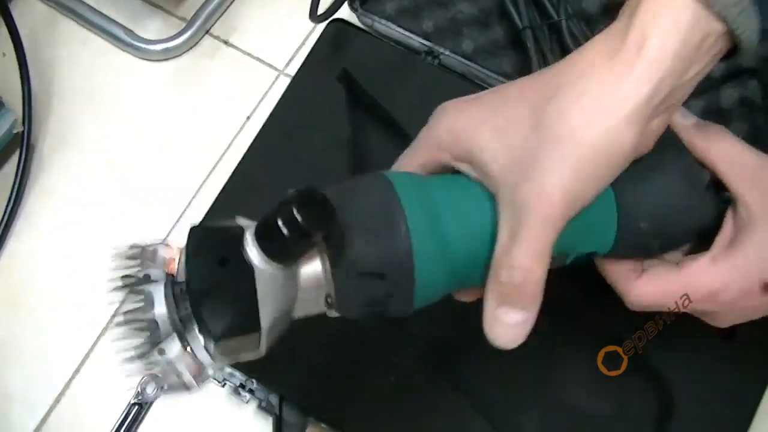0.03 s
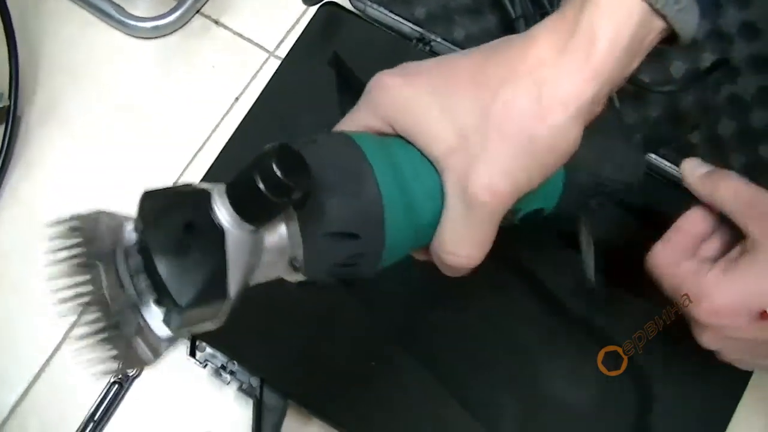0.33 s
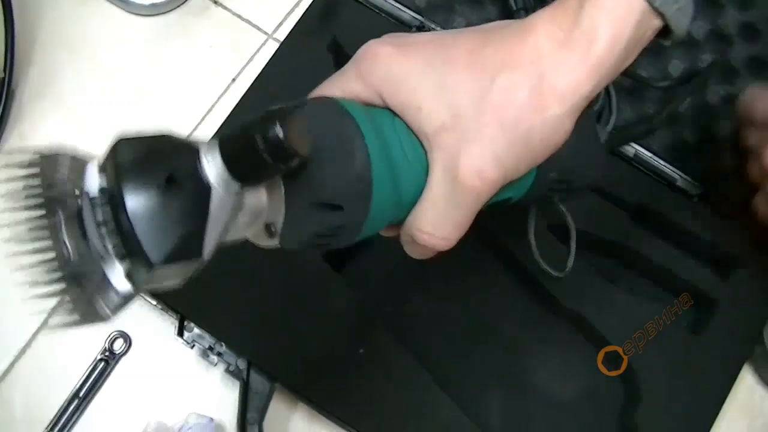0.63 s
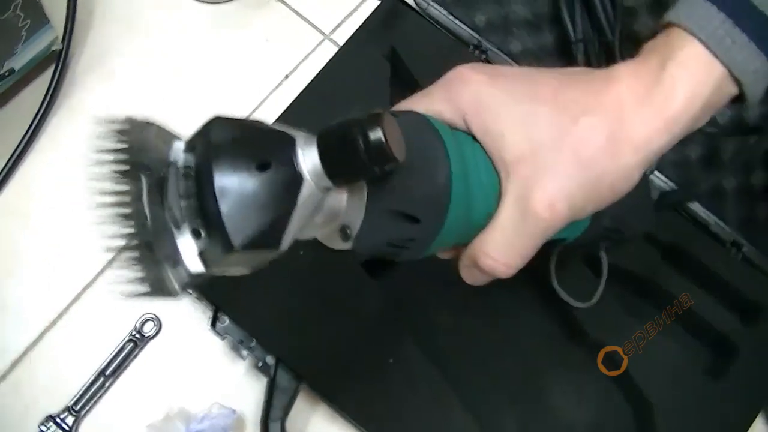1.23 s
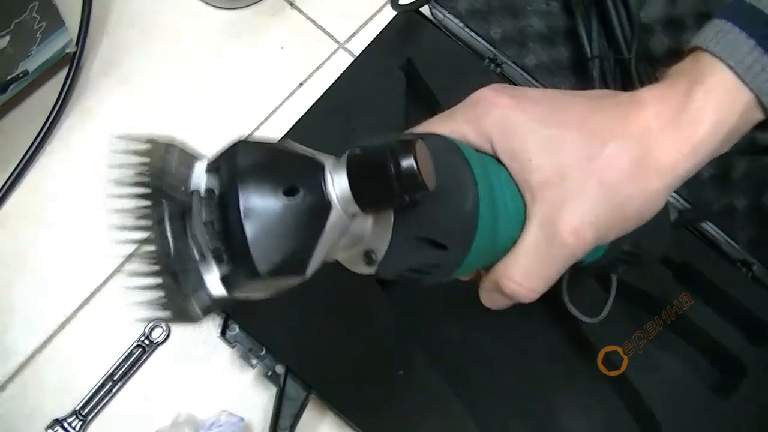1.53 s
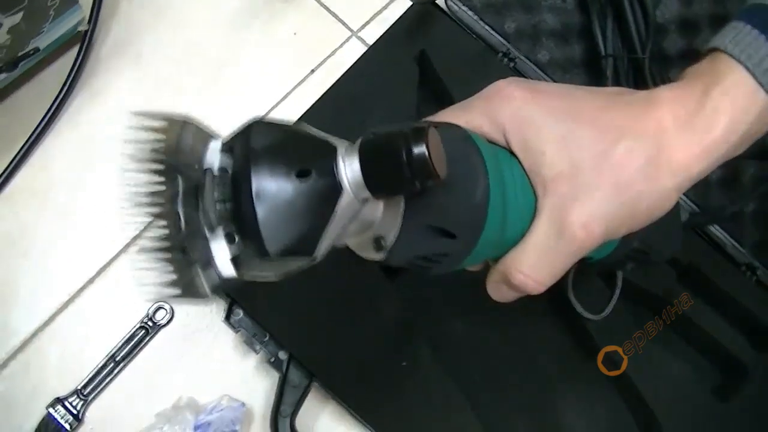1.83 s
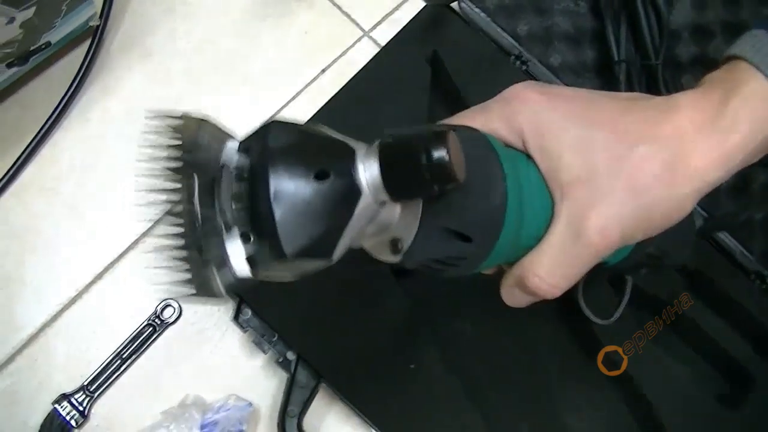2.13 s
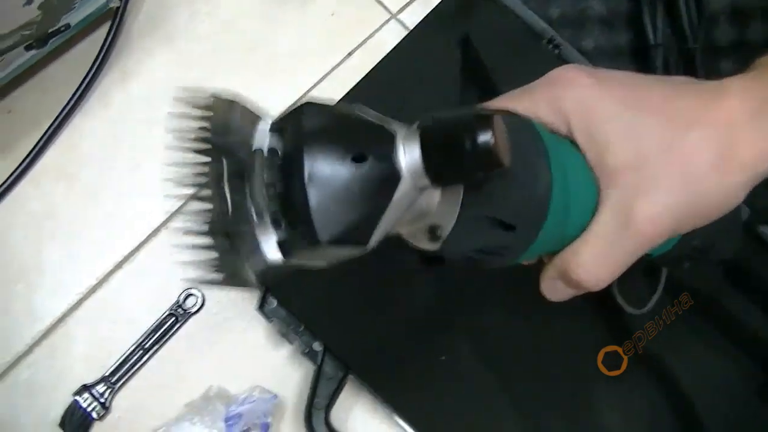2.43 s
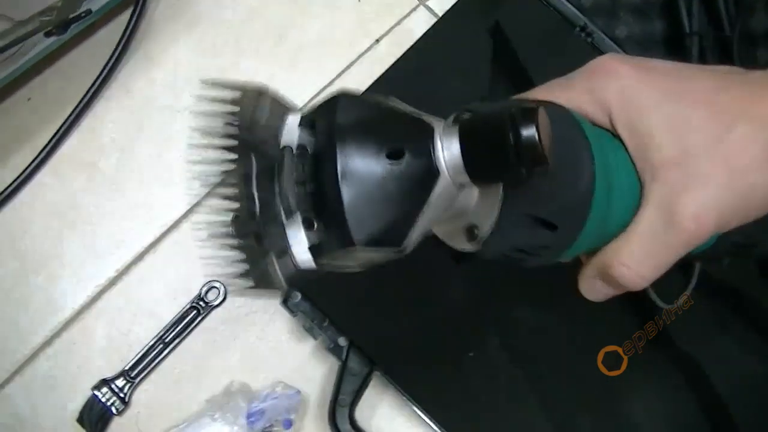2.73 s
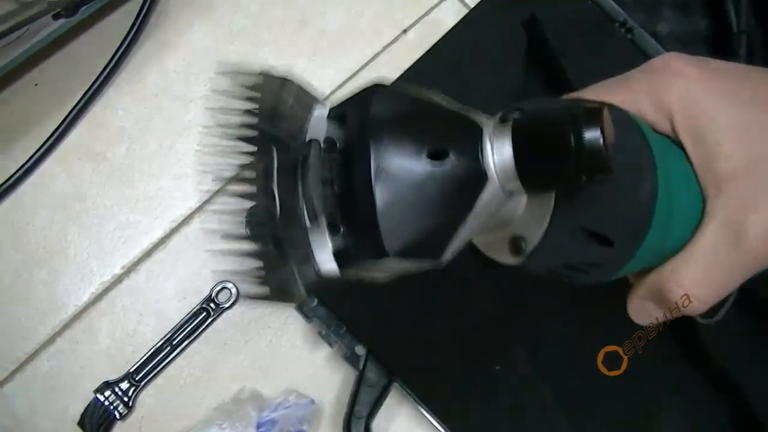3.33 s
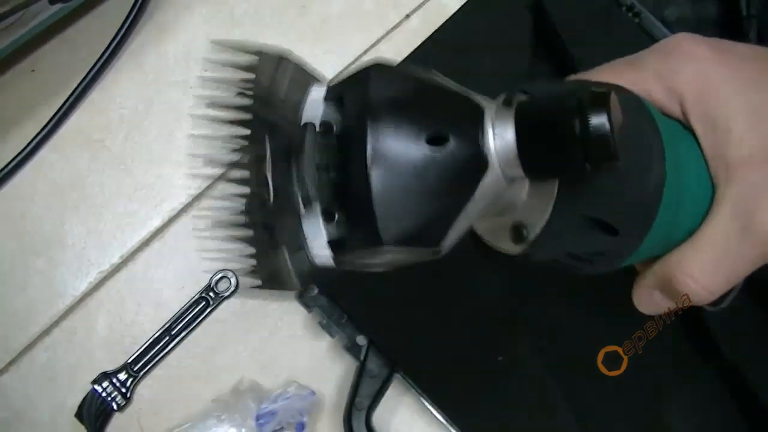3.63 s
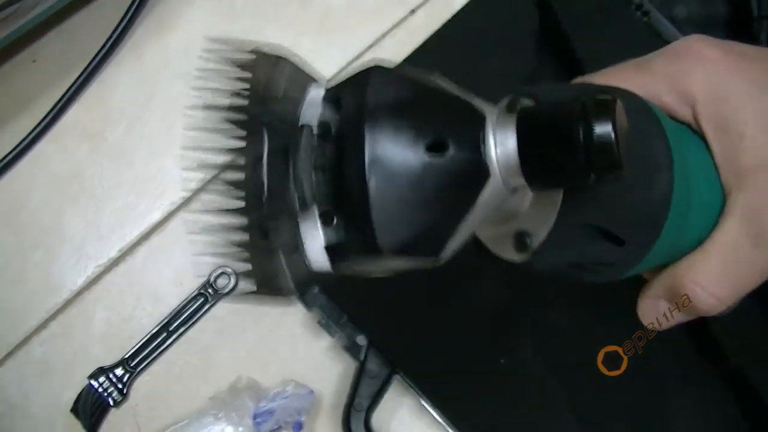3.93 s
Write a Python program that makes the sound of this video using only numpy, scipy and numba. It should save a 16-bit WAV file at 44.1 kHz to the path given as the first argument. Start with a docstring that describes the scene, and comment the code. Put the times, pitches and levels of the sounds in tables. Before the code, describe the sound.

Handheld electric shears buzz continuously without cutting, their steel blades clattering fast, close by indoors.

```python
"""A small tiled room, with electric sheep shears running unloaded in the hand, close to the microphone.
The motor hums and its fan whistles over rushing air. A geared crank knocks the drive fork and throws
the steel cutter to and fro, clacking at each reversal. The balance shifts as the tool is turned,
and the recorder's gain control ducks after the hardest clacks."""
import sys
import numpy as np
from scipy import signal
from scipy.fft import rfft, irfft
from scipy.io import wavfile
from scipy.ndimage import uniform_filter1d
from numba import njit

SR = 44100
rng = np.random.default_rng(int(sys.argv[2]) if len(sys.argv) > 2 else 0)


def generate_wav(signal):
    """Clip the signal to [-1, 1] and save it as 16-bit WAV at the path in sys.argv[1]."""
    frames = np.transpose(np.atleast_2d(signal))
    scaled = np.clip(frames, -1, 1) * 32767
    pcm = np.round(scaled).astype(np.int16)
    wavfile.write(sys.argv[1], SR, pcm)


N = 176400
TIME = np.arange(N) / SR


def undb(db):
    """Decibels to gain."""
    return 10 ** (np.asarray(db) / 20)


def level(x, db):
    """Set the rms level."""
    return x * undb(db) / np.sqrt(np.mean(x ** 2))


def gains(table):
    """One gain curve for each dB column of a table over time."""
    when, *columns = np.array(table, float).T
    return [undb(np.interp(TIME, when, db)) for db in columns]


def wander(rate_hz):
    """Smooth random drift at unit level."""
    hold = max(int(SR / rate_hz), 2)
    steps = np.repeat(rng.standard_normal(N // hold + 1), hold)
    return level(uniform_filter1d(steps, hold)[:N], 0)


def colour(x, points):
    """Causal filter through (Hz, dB) points."""
    hz, db = np.array(points, float).T
    size = 4096
    bins_hz = np.maximum(np.arange(size // 2 + 1) * SR / size, 1)
    response = undb(np.interp(np.log(bins_hz), np.log(hz), db))
    cepstrum = irfft(np.log(response))
    cepstrum[1:size // 2] *= 2
    cepstrum[size // 2 + 1:] = 0
    return signal.fftconvolve(x, irfft(np.exp(rfft(cepstrum))))[:N]


def resonate(x, hz, width_hz):
    """One resonance, at unit level."""
    return level(signal.lfilter(*signal.iirpeak(hz, hz / width_hz, fs=SR), x), 0)


def tone(turns, multiple, flutter):
    """A tone locked to the motor, trembling in level and phase."""
    tremble = 1 + flutter * (wander(90) + 1j * wander(90))
    return level(np.real(tremble * np.exp(2j * np.pi * (multiple * turns + rng.random()))), 0)


def blows(times, sizes):
    """An impulse at each time."""
    out = np.zeros(N)
    inside = (times >= 0) & (times < (N - 1) / SR)
    np.add.at(out, (times[inside] * SR).astype(int), sizes[inside])
    return out


def chatter(hits, ring_s):
    """A short burst of fresh rattle after each impulse."""
    pole = np.exp(-2 / (ring_s * SR))
    energy = signal.lfilter([1 - pole], [1, -pole], hits ** 2 + 1e-18)
    return np.sqrt(energy) * rng.standard_normal(N)


def ring(ring_s):
    """Dense, even, quickly dying modes of one contact point."""
    t = TIME[:1024]
    spectrum = rfft(rng.standard_normal(len(t)) * np.exp(-t / ring_s))
    return irfft(spectrum / np.sqrt(uniform_filter1d(abs(spectrum) ** 2, size=13)))


# Motor and gear tones, as multiples of the motor speed, and the level of each in dB.
HUM_ORDERS = (1, 1.08, 1.32, 6, 11.68, 12.32, 17.06, 18, 24)
HUM_DB = (-49, -58, -54.5, -49, -42, -40.5, -43, -39, -51)
# Gear whine at the microphone. Each row: time in seconds, whine in dB, upper sideband in dB.
WHINE_LEVELS = [(0, -32.5, -47), (.45, -30, -43), (.7, -47, -39), (1.2, -40, -35), (1.8, -49, -44),
                (2.5, -40, -36), (3, -39, -32), (3.35, -36, -30), (3.6, -42, -42), (4, -36, -37)]

def motor(turns):
    """The shaft hums and the gears whine."""
    hum = sum(undb(db) * tone(turns, order, flutter=.33 + .06) for order, db in zip(HUM_ORDERS, HUM_DB))
    whine, sideband = gains(WHINE_LEVELS)
    return hum + whine * tone(turns, 12, flutter=.33) + sideband * tone(turns, 12.24, flutter=.33)


# Cooling air, heard close up. Each row: frequency in Hz, gain in dB.
AIR_SPECTRUM = [(25, -30), (90, -26), (160, -18.5), (300, -16), (440, -8), (530, -12.5), (590, -1.5),
                (680, -1.5), (770, -0.5), (950, -1.5), (1170, 1.5), (1600, -1.9), (2100, -1), (2600, 5),
                (3600, -1), (5200, -0.5), (6400, -5.5), (8000, -7.5), (11000, -11.5)]
# Hollow ring of the air in the motor casing. Each row: time in seconds, level in dB.
HOLLOW_LEVELS = [(0, -38), (.5, -34), (.63, -38), (1, -30.5), (1.3, -38), (1.6, -35), (1.9, -37.5),
                 (2.25, -35), (2.7, -44.5), (4, -41)]

def cooling_air(rush_gain):
    """Air rushes through the vents and rings the casing."""
    flow = level(colour(rng.standard_normal(N), AIR_SPECTRUM), -23.5)
    hollow = resonate(colour(rng.standard_normal(N), AIR_SPECTRUM), hz=773, width_hz=112)
    return rush_gain * flow + gains(HOLLOW_LEVELS)[0] * hollow


def fan_whistle(turns, blades=9):
    """The fan whistles at the rate its blades pass."""
    return undb(-22.5) * tone(turns, blades, flutter=.11)


# Contacts in one crank turn. Each row: place in turns, fork knock and cutter clack in relative dB.
CONTACTS = [(.028, -3.5, -3.5), (.062, -7, -4), (.15, -24, -6.5), (.44, -4, -12), (.527, 1, -2),
            (.565, -8, -7.5), (.66, -28, -8), (.94, -9, -8.5)]

def rattle(crank, sizes_db, ring_s, loose, jitter_s=.00004, scatter_db=1.56):
    """Each contact strikes once a crank turn; part of its ring repeats, part is loose chatter."""
    out = 0
    for (place, *_), db in zip(CONTACTS, sizes_db):
        times = np.interp(np.arange(int(crank[-1]) + 1) + place, crank, TIME, right=-1)
        late, strong = rng.standard_normal((len(times), 2)).T
        hits = blows(times + jitter_s * late, undb(db + scatter_db * np.minimum(strong, 1.7)))
        ringing = signal.fftconvolve(hits, ring(ring_s))[:N]
        out = out + np.sqrt(1 - loose) * ringing + np.sqrt(loose) * chatter(hits, ring_s)
    return out


# Ring of the gear housing. Each row: frequency in Hz, gain in dB.
HOUSING_SPECTRUM = [(100, -50), (300, -32), (520, -20.5), (590, -19), (760, -9.5), (950, -17),
                    (1170, -12.5), (1600, -12), (2100, -8), (2450, 3.5), (2900, -0.5), (3500, -12.5),
                    (4500, -11.5), (6500, -32), (11000, -19)]

def drive_fork(crank):
    """The fork's knocks ring the gear housing."""
    knocks = rattle(crank, np.array(CONTACTS)[:, 1], ring_s=.00086, loose=.55)
    return level(colour(knocks, HOUSING_SPECTRUM), -24.5)


# Ring of the cutter head. Each row: frequency in Hz, gain in dB.
HEAD_SPECTRUM = [(100, -38), (600, -20), (2000, -12.5), (2700, -4.5), (3200, -5.5), (3600, -12), (4150, -2),
                 (4650, 0.5), (4950, -1), (5350, -0.5), (5850, -3), (6350, -10.5), (6900, -7.5),
                 (7400, -10.5), (8300, -10.5), (11000, -16.5)]
# Sharp resonances of the steel head. Each row: frequency in Hz, width in Hz.
STEEL_MODES = [(4330, 84), (4590, 72), (5330, 180)]
# What reaches the microphone as the head swings round. Each row: time in seconds, dB of each mode.
STEEL_FACING = [(0, -48, -30, -22.5), (.2, -55, -27, -31), (.5, -46, -24.5, -29), (.65, -47, -33, -34),
                (.95, -35, -32, -27.5), (1.3, -31, -43, -29), (1.5, -32, -44, -38), (2, -33, -40, -35),
                (2.5, -45, -42, -34), (3.3, -39, -38, -30), (3.6, -52, -47, -37), (4, -42, -42, -33)]

def cutter_head(crank, clack_gain):
    """The cutter clacks at each reversal and keeps the steel head ringing."""
    strokes = rattle(crank, np.array(CONTACTS)[:, 2], ring_s=.001, loose=.7)
    clacks = level(colour(strokes, HEAD_SPECTRUM), -21.5)
    scrape = colour(strokes * rng.standard_normal(N), HEAD_SPECTRUM)
    steel = sum(gain * resonate(scrape, *mode) for mode, gain in zip(STEEL_MODES, gains(STEEL_FACING)))
    return clack_gain * clacks + steel


# The hardest clacks. Each row: start in seconds, strength in relative dB.
HARD_CLACKS = [(.1337, -7), (.5306, 0), (.6099, 4), (.8611, 1), (1.324, 7), (1.4299, -2.5), (1.6016, -20),
               (1.8538, -10), (1.9596, -1), (2.145, -1), (2.2243, -14), (2.4893, 4.5), (2.7543, -3.1),
               (2.9925, 7), (3.1117, -13), (3.2577, 4.5), (3.4693, 0.5), (3.5488, 2)]

def hard_clacks():
    """Now and then the cutter hits its stop much harder."""
    times, db = np.array(HARD_CLACKS).T
    hits = blows(times, undb(db + 9))
    return colour(chatter(hits, ring_s=.00033), HEAD_SPECTRUM)


def room(x, t60_s=.18, echo_db=-8.5):
    """Reflections from the tiles and the open case follow the direct sound to the microphone."""
    t = TIME[:SR // 2]
    tail = rng.standard_normal(len(t)) * undb(-60 * t / t60_s) * (t > .002)
    return x + undb(echo_db) * signal.fftconvolve(x, tail / np.sqrt(np.sum(tail ** 2)))[:N]


# Motor speed. Each row: time in seconds, turns per second.
MOTOR_SPEED = [(0, 313.59), (.3, 314.41), (.65, 315.88), (1, 315.16), (1.4, 314.83), (2, 314.57),
               (2.7, 314.46), (3.5, 314.67), (4, 315.11)]
# The tool turns near the microphone. Each row: time in seconds, then fork, cutter, air, fan gain in dB.
TURNING = [(0, -9, -4, -1, -15), (.13, -4, -2.5, -1.5, -4.5), (.27, -2.5, -2.5, 1, -8),
           (.5, -3.5, 0, 2.5, -6), (.62, -11, -2, -1, -11.5), (.76, 1, .5, 2.5, 0), (.98, -1, 1, 3, -6),
           (1.25, 1, -0.5, 2.5, 1), (1.7, 0, -3.5, -0.5, -4.5), (2.05, -3.5, -1, 0.5, 0),
           (2.9, -0.5, -3, 0, 1), (3.25, 0, -1.5, 2, 0), (3.6, -1.5, -5, -2.5, -2.5), (4, 2, 2.5, 4, 1.5)]

def scene():
    """The motor drives fan, gears and cutter together."""
    turns = np.cumsum(np.interp(TIME, *np.array(MOTOR_SPEED).T)) / SR
    crank = turns * (6 / 50)  # gear ratio
    fork_gain, clack_gain, rush_gain, fan_gain = gains(TURNING)
    knocks = fork_gain * drive_fork(crank)
    clacks = cutter_head(crank, clack_gain)
    whistle = fan_gain * fan_whistle(turns)
    clatter = room(knocks + clacks + hard_clacks())
    return (clatter + cooling_air(rush_gain) + whistle + motor(turns))[None]


@njit
def peaks(x, fall):
    """Peak follower: jumps up at once and sinks slowly."""
    out, held = np.empty(len(x)), 0.
    for i in range(len(x)):
        held = max(abs(x[i]), held * fall)
        out[i] = held
    return out


def record(dry):
    """Gain control ducks just after each peak; overloads clip and the top is cut steeply."""
    attack_s, release_s, threshold_db, slope, makeup_db = .0014, .094, -6.5, .71, .83
    envelope = peaks(dry[0], np.exp(-1 / (release_s * SR)))
    excess = np.log(np.maximum(envelope / undb(threshold_db), 1))
    pole = np.exp(-1 / (attack_s * SR))
    gain = undb(makeup_db) * np.exp(-slope * signal.lfilter([1 - pole], [1, -pole], excess))
    lowpass = signal.ellip(12, .1, 75, 10850, fs=SR, output="sos")
    return signal.sosfilt(lowpass, np.clip(dry * gain, -1, 1))


dry = scene()
out = record(dry)
generate_wav(out)
```